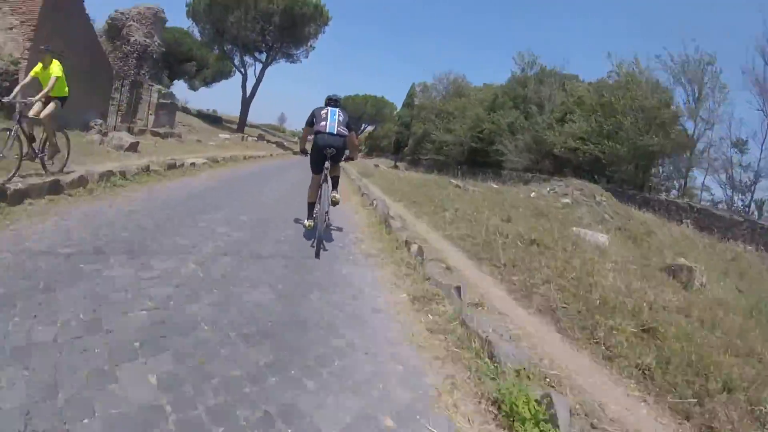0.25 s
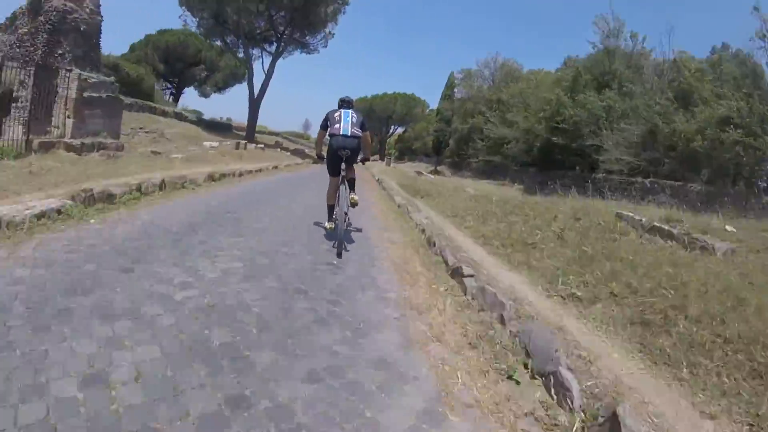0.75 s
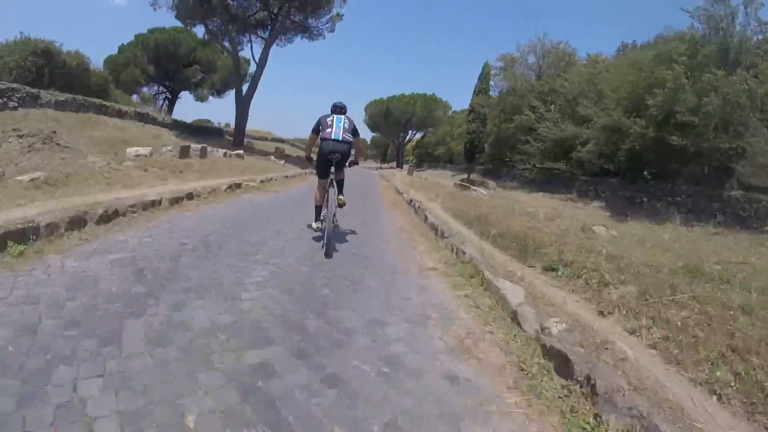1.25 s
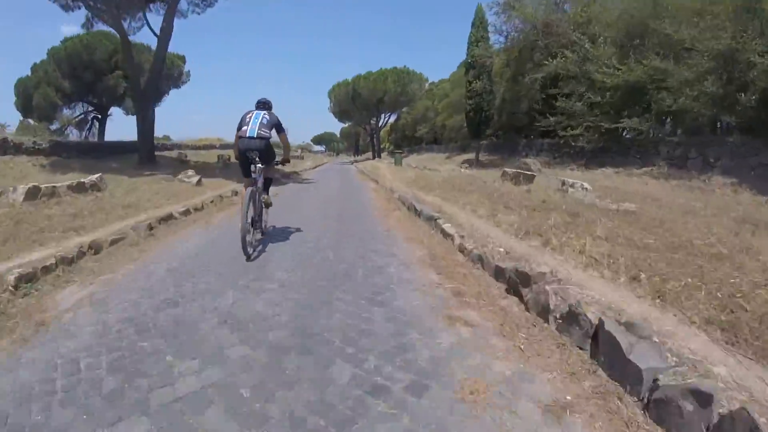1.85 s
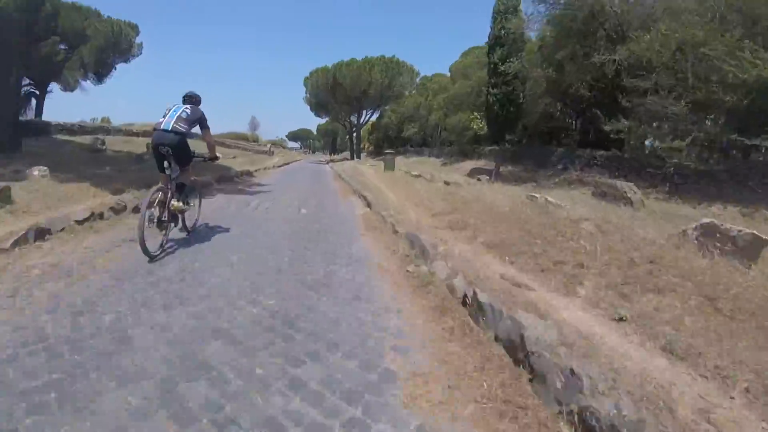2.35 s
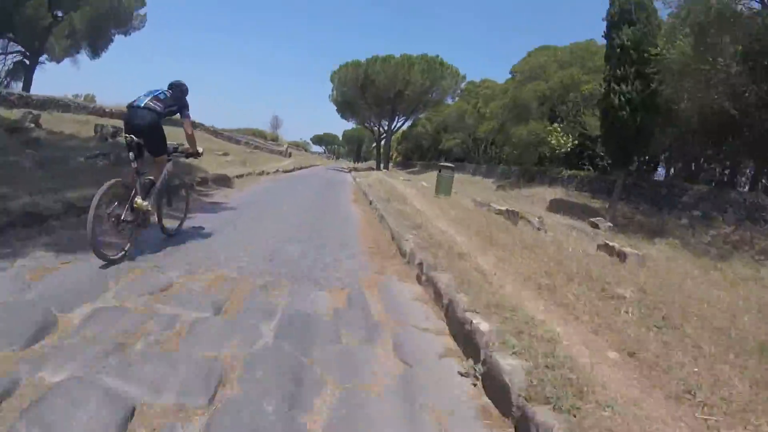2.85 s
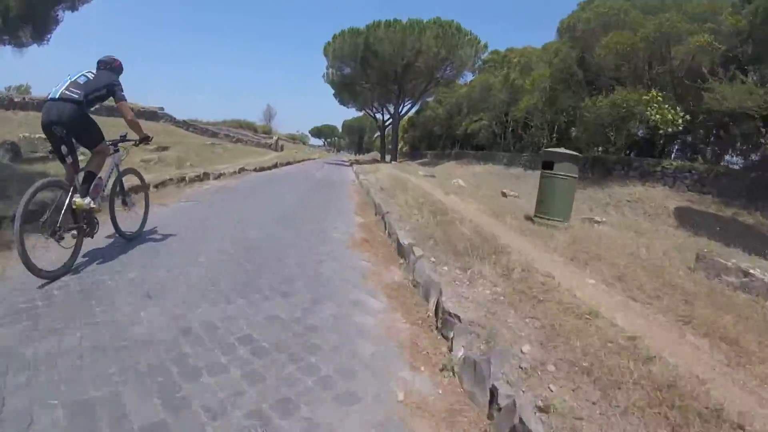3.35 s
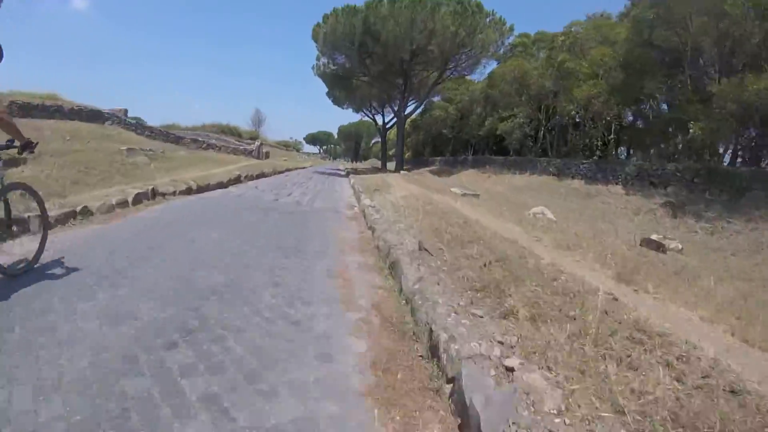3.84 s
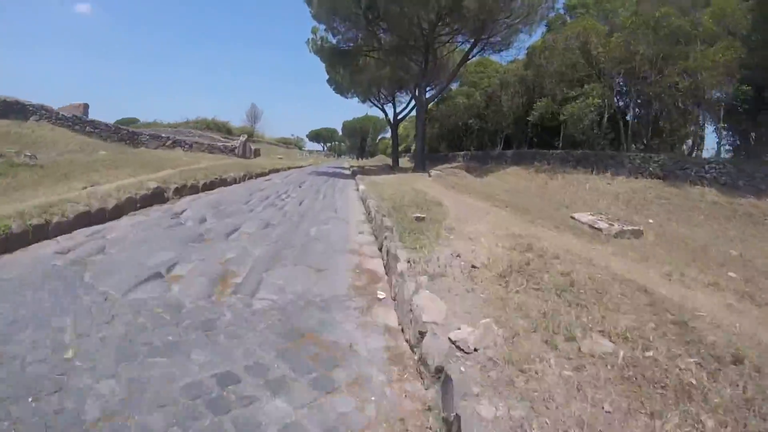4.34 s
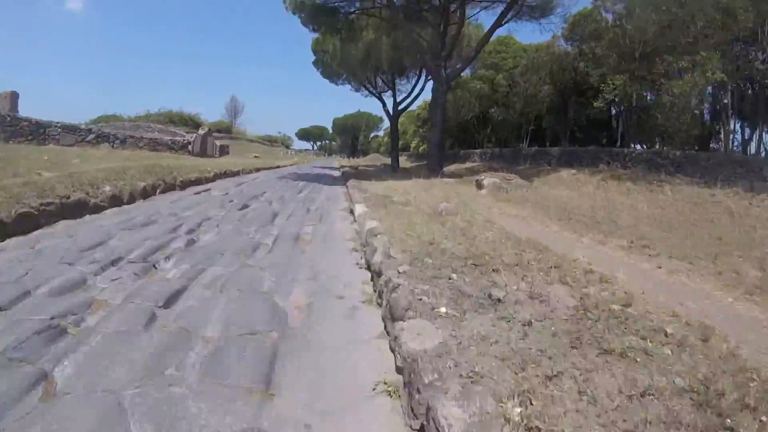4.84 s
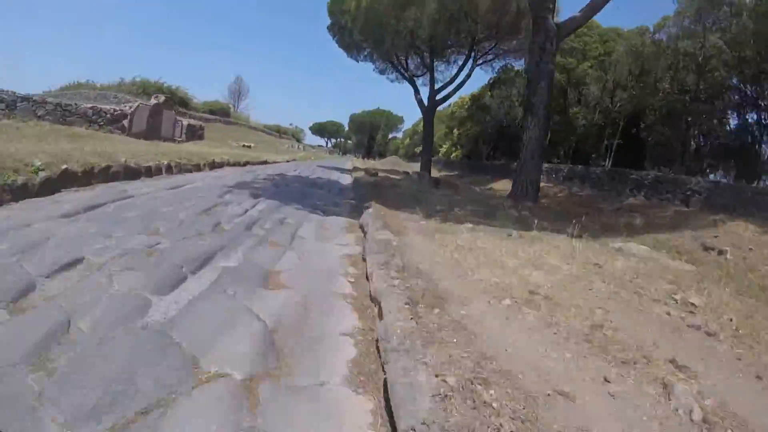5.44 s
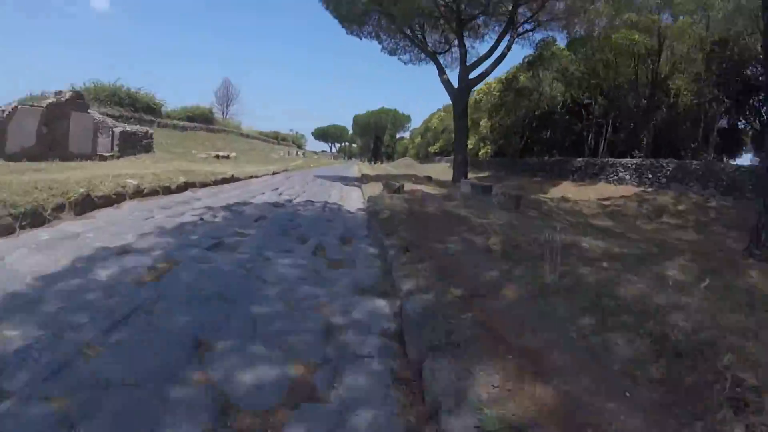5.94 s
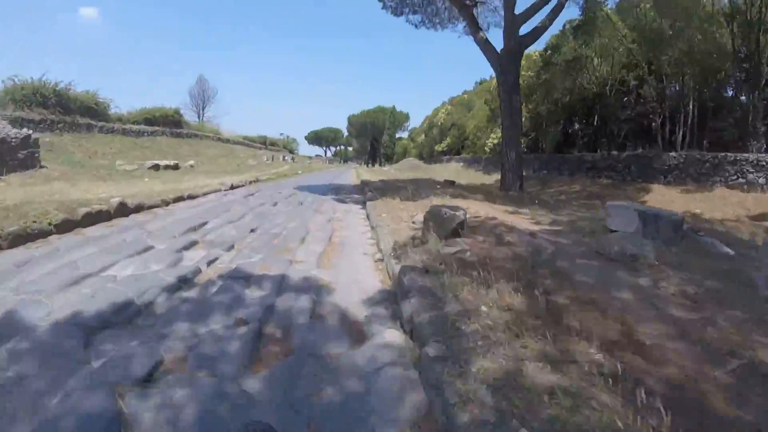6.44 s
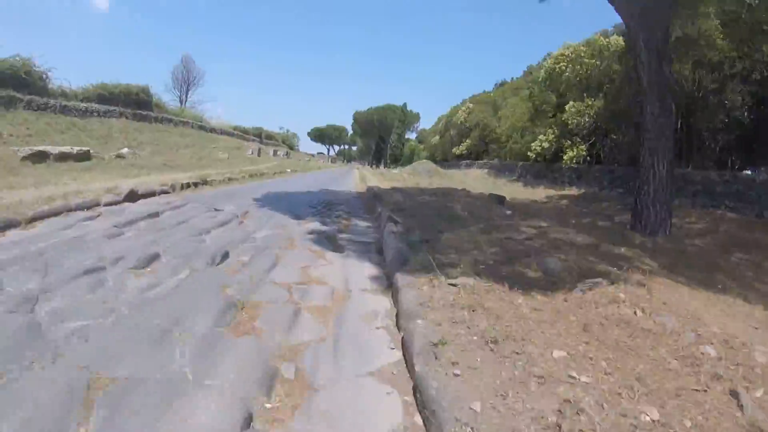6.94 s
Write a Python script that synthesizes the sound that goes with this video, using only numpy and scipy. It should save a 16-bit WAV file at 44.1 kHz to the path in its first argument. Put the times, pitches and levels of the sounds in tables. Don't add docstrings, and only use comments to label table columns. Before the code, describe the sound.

Low, shaky rumble of a bike on rough stone paving, with hollow tube knocks, small clicks and wind buffeting, growing more broken and clattery.

```python
import sys
import numpy as np
from scipy import signal
from scipy.io import wavfile
from scipy.ndimage import uniform_filter1d

SR = 44100
rng = np.random.default_rng(int(sys.argv[2]) if len(sys.argv) > 2 else 0)


def file_out(sig):
    cols = np.atleast_2d(sig).T
    lim = np.clip(cols, -1, 1)
    pcm = np.round(lim * 32767).astype(np.int16)
    wavfile.write(sys.argv[1], SR, pcm)


def convert_level_to_amplitude(level_db):
    exponent = np.asarray(level_db, float) / 20
    return 10 ** exponent


N = 317074

# t/s, unevenness (0-1)
UNEVENNESS = [(0, 0), (2.9, 0.56), (3.1, 0.9), (3.5, 0.5), (4.4, 0.5), (4.9, 1), (7.19, 0.95)]
# t/s, level/dB
FRAME_SHAKING = [(0.0, -20.5), (0.14, -26), (0.41, -24), (0.95, -22), (1.35, -22.5), (1.55, -20.5),
                 (2.1, -20.5), (2.55, -20.5), (3.15, -23), (3.5, -26), (4.0, -24), (4.3, -23), (5.13, -24),
                 (5.33, -23.5), (5.6, -25), (6.1, -26.5), (6.5, -31), (7.19, -27)]
# t/s, peak level/dB, ring f/Hz, decay time t60/s
TUBE_KNOCKS = [(0.003, -10.5, 710, 0.028), (0.038, -17, 646, 0.056), (0.1002, -16, 685, 0.085),
               (0.616, -16.5, 590, 0.027), (2.734, -16.5, 570, 0.038), (4.343, -19.5, 570, 0.051),
               (1.353, -14, 570, 0.074), (1.418, -11.5, 563, 0.028), (1.799, -4, 554, 0.011),
               (3.219, -12, 692, 0.077), (3.274, -13.5, 545, 0.082), (3.311, -13, 623, 0.059),
               (4.204, -13, 600, 0.037), (4.728, -4.5, 457, 0.037), (4.843, -15, 640, 0.034),
               (5.073, -13.5, 398, 0.21), (5.118, -13.5, 595, 0.15), (5.424, -1.5, 367, 0.019),
               (5.658, -10, 425, 0.021), (5.821, -9.5, 435, 0.018), (5.985, -12.5, 423, 0.037),
               (6.093, -14.5, 637, 0.039), (6.339, -18, 560, 0.045), (6.413, -10, 580, 0.033),
               (6.556, -15.5, 553, 0.028), (6.6907, -6, 583, 0.013), (6.783, -11.5, 586, 0.013),
               (7.109, -18, 596, 0.094), (0.153, -17.5, 580, 0.064), (0.467, -17.5, 537, 0.077),
               (0.931, -15, 592, 0.092), (1.052, -18.5, 590, 0.031), (1.217, -19.5, 540, 0.094),
               (1.508, -17.5, 650, 0.062), (1.719, -17, 566, 0.086), (1.878, -13.5, 614, 0.053),
               (2.081, -19.5, 686, 0.11), (2.373, -16.5, 520, 0.053), (2.415, -21, 575, 0.028),
               (2.477, -19, 596, 0.068), (2.842, -12, 553, 0.11), (3.04, -8.5, 586, 0.017),
               (3.363, -15, 570, 0.03), (3.587, -17.5, 567, .04), (3.84, -14.5, 526, 0.062),
               (5.245, -16, 550, 0.051), (5.787, -22, 640, 0.071), (6.253, -21.5, 701, 0.099),
               (6.644, -19.5, 540, 0.033), (5.3, -25, 715, 0.039)]


def evened(x):
    return x / np.sqrt(np.mean(x ** 2) + 1e-20)


def curve(rows):
    s, values = np.transpose(rows)
    return np.interp(np.arange(N) / SR, s, values)


def shaking_above_mean():
    mean_db = -23
    return curve(FRAME_SHAKING) - mean_db


def add(mix, s, sound):
    part = mix[round(s * SR):][:len(sound)]
    part += sound[:len(part)]


def band(x, lo_hz, hi_hz, order=2):
    return signal.sosfilt(signal.butter(order, [lo_hz, hi_hz], "band", fs=SR, output="sos"), x)


def colour(x, points):
    f, db = np.transpose(points)
    hz = abs(np.fft.fftfreq(8192, 1 / SR))
    gain_db = np.interp(np.log(hz + 1), np.log(f + 1), np.maximum(db, -100))
    log_gain = np.log(convert_level_to_amplitude(gain_db))
    response = np.fft.ifft(np.exp(np.conj(signal.hilbert(log_gain)))).real[:4096]
    return signal.oaconvolve(x, response)[:len(x)]


def resonate(x, hz, width):
    turn = np.exp(2j * np.pi * np.cumsum(hz * np.ones(len(x))) / SR)
    r = np.exp(-np.pi * width / SR)
    return 2 * (turn * signal.lfilter([1 - r], [1, -r], x / turn)).real


def lumps(lo_hz, hi_hz, depth_db):
    wander = evened(band(rng.standard_normal(N), lo_hz, hi_hz, order=1))
    return convert_level_to_amplitude(depth_db * np.clip(wander, -3, 3))


def taps(per_s, spread_db):
    draw = rng.random(N)
    size = np.minimum(rng.exponential(1, N), 4)
    return evened((draw < per_s / SR) * convert_level_to_amplitude(spread_db * size) * rng.choice([-1, 1], N))


def cicadas():
    # t/s, level/dB
    song_level = [(0, -85.5), (.9, -77.5), (1.4, -69.5), (1.75, -66), (2.1, -64), (2.45, -59), (2.8, -60),
                  (3.0, -58)]
    # f/Hz, width/Hz, level/dB
    tymbal = [(4750, 600, 0), (5400, 700, -1), (8200, 2200, -17)]
    t = np.arange(N) / SR
    buckles = taps(per_s=4000, spread_db=1.5)
    song = sum(convert_level_to_amplitude(db) * resonate(resonate(buckles, hz, w), hz, w) for hz, w, db in tymbal)
    throb_db = 9.5 * np.cos(2 * np.pi * 5.31 * (t - 1.1)) * np.clip(1.4 - 0.47 * t, .2, 1)
    passed = np.clip((song_level[-1][0] - t) / 0.17, 0, 1)
    return convert_level_to_amplitude(curve(song_level) + throb_db) * evened(song) * passed * lumps(15, 80, 1.7)


def air():
    # t/s, level/dB
    buffeting = [(0.0, -27.5), (0.86, -25), (1.82, -22.5), (3.12, -23.5), (3.56, -31), (3.95, -29),
                 (4.14, -23.5), (4.9, -24.5), (5.63, -23), (6.1, -25.5), (6.4, -32.5), (6.6, -25.5),
                 (7.19, -31.5)]
    gusts = band(rng.standard_normal(N), 18.0, 43.6) * lumps(4.0, 9.7, 0.62)
    return convert_level_to_amplitude(curve(buffeting) - 1.0) * evened(gusts)


def chips():
    # t/s,
    # level/dB, f/Hz
    frame_chips = [(0.209, -57, 3700), (0.679, -50, 2800), (0.762, -54, 2800), (0.886, -50, 3700),
                   (1.107, -55.5, 3700), (1.175, -44, 2250), (1.6908, -40.5, 2400), (2.983, -55, 5200),
                   (3.047, -56.5, 8250), (3.075, -44, 1300), (3.141, -42, 1280), (3.222, -50.5, 3700),
                   (3.317, -61, 8250), (3.444, -60, 8200), (3.486, -60, 8250), (3.6, -68, 8250),
                   (3.923, -46, 5200), (3.956, -58, 8250), (4.14, -45.5, 1800), (4.39, -45, 1300),
                   (4.454, -46, 3700), (4.736, -38, 1300), (4.875, -57.5, 8250), (4.908, -41, 1300),
                   (5.008, -49, 5250), (5.077, -40, 1300), (5.128, -36, 2720), (5.249, -44, 1290),
                   (5.328, -52.5, 5300), (5.515, -53, 5250), (5.525, -59, 8200), (5.535, -38, 1270),
                   (5.649, -50.5, 3700), (5.6601, -41, 8100), (5.672, -51, 5250), (5.681, -62, 8250),
                   (5.69, -54, 5250), (5.728, -51, 5250), (5.737, -54, 8250), (5.788, -46, 2300),
                   (5.823, -49.5, 5250), (5.914, -52, 5250), (5.927, -62, 8200), (5.99, -47, 5250),
                   (6.083, -65, 8250), (6.092, -41, 1290), (6.099, -62, 8250), (6.221, -41.5, 1290),
                   (6.234, -62.5, 8200), (6.338, -54, 1300), (6.368, -62, 5250), (6.386, -60, 8250),
                   (6.596, -59, 5250), (6.619, -55, 3700), (6.646, -41, 1300), (6.799, -58, 8250),
                   (6.998, -53, 2300), (7.114, -58.5, 8200),
                   (1.6908, -41, 3450), (3.046, -46, 3760), (3.047, -52, 5170), (3.439, -66, 8250),
              (3.6, -71, 8250), (4.087, -48, 3700), (4.134, -48, 3700), (4.14, -68, 8250),
              (4.629, -66.5, 8250), (4.729, -47, 3700), (4.73, -46, 2300), (4.73, -60.5, 8250),
              (4.73, -55, 5250), (4.742, -47, 2300), (4.799, -68, 8250), (5.054, -71, 8250),
              (5.078, -58, 5250), (5.127, -49.5, 5250), (5.128, -64, 8250), (5.212, -52, 5250),
              (5.225, -61.5, 8250), (5.375, -68, 8250), (5.426, -51, 5250), (5.534, -59, 8250),
              (5.539, -45, 3700), (5.568, -59, 5250), (5.64, -50, 3700), (5.6605, -33, 3700),
              (5.681, -61.5, 8250), (5.689, -44, 3700), (5.801, -66.5, 8250), (5.824, -44, 3700),
              (5.912, -56, 5250), (5.984, -55.5, 8250), (5.992, -51, 2300), (6.08, -55, 5250),
              (6.097, -60.5, 8250), (6.157, -64, 8250), (6.203, -46.5, 3700), (6.221, -62, 5250),
              (6.234, -57.5, 8100), (6.235, -53, 3700), (6.235, -54, 5250), (6.259, -47.5, 2300),
              (6.284, -61, 8250), (6.368, -65, 8250), (6.473, -59, 3700), (6.505, -56, 2300),
              (6.506, -50, 3700), (6.586, -67, 8250), (6.619, -62, 5250), (6.734, -56, 5250),
              (6.798, -48, 5200), (6.888, -56, 2300), (6.997, -55, 8250), (7.115, -46.5, 5170)]
    chip_ms, relative_width, contact_weight = 1.3, 0.4, 3.5
    out = np.zeros(N)
    events = frame_chips
    u = np.arange(700) / SR * 1000 / chip_ms
    contact = contact_weight * (np.arange(700) == 20)
    for (s, db, hz), noise in zip(events, rng.standard_normal((len(events), 700))):
        blow = noise * u ** .5 * np.exp(-2.2 * u) + contact
        width = relative_width * hz
        ring = resonate(resonate(blow, hz, width), hz, width)
        add(out, s, convert_level_to_amplitude(db) * ring * np.sqrt(90 / np.sum(ring ** 2)))
    return out


def cracks():
    # t/s, peak level/dB, direction (+1 or -1), settling time/ms
    releases = [
        (4.5763, -32.5, -1, 0.046),
        (4.5835, -13.5, -1, 0.11),
        (5.657, -35, 1, .05),
        (5.6606, -12.5, 1, 0.95),
    ]
    t, out = np.arange(700) / SR, np.zeros(N)
    for s, db, way, ms in releases:
        add(out, s, np.sign(way) * convert_level_to_amplitude(db) * band(np.exp(-t * 1000 / ms), 500, 6500, order=1))
    return out


def bracket_raps():
    # t/s, peak level/dB
    raps = [(3.018, -29), (3.041, -29), (3.071, -31), (3.142, -32), (3.337, -40.5), (4.617, -49),
            (4.668, -43), (4.716, -36), (4.7288, -30), (4.875, -44), (4.984, -35), (5.04, -33),
            (5.192, -41), (5.208, -36), (5.606, -31), (5.719, -40), (5.944, -40), (5.985, -30),
            (6.069, -37), (6.091, -34), (6.149, -35), (6.32, -49), (6.452, -46), (6.525, -43),
            (6.739, -42.5)]
    t60_s, rise_s = .02, 0.0011
    t, out = np.arange(700) / SR, np.zeros(N)
    note = sum(np.sin(2 * np.pi * hz * t) for hz in (1070, 1500))
    note = note * convert_level_to_amplitude(-60 * t / t60_s) * np.minimum(t / rise_s, 1)
    for s, db in raps:
        add(out, s, convert_level_to_amplitude(db) * note)
    return out


def clicks():
    # t/s, level/dB, brightness/dB, length/ms
    snaps = [(0.006, -43.5, 8, 4.9), (0.042, -51.5, 0, 2.9), (2.567, -46, -2, 0.99),
             (2.983, -51.5, 14, 1.2), (3.047, -52, -5, 0.88), (4.731, -33.5, -20, 6.2),
             (5.008, -54, 10, 3.1), (5.063, -44, 6, 1.2), (5.126, -46, -18.5, 5), (5.479, -51, 11, 2.4),
             (5.533, -62, 7, 1.2), (5.543, -42.5, 15.5, 2), (5.662, -41, -7, 1.7),
             (5.985, -35.5, -13.5, 5.9), (6.203, -47.5, 7.5, 2.8), (6.506, -50.5, 6.5, 6.7),
             (6.798, -39, -15, 6), (6.997, -43.5, 0, 6.4), (7.11, -39, -12, 5.6)]
    # t/s, level/dB, length/ms
    slaps = [(3.038, -38, 4.8), (3.141, -50.5, 3.8), (3.217, -44, 17), (3.272, -39.5, 3.8),
             (3.311, -39, 13), (3.434, -40, 13), (3.914, -48, 34), (3.066, -54, 11), (3.485, -43, 4.4),
             (4.746, -49, 8.9), (4.805, -41, 8.9), (4.9, -48, 19), (4.94, -47, 8.4), (5.074, -41, 10),
             (5.087, -42, 10), (5.112, -39.5, 33), (5.25, -57, 6.3), (5.425, -43, 5.2), (5.584, -35.5, 2.6),
             (5.673, -40, 3.8), (5.728, -41, 11), (5.787, -44.5, 12), (6.091, -48, 4.7), (6.211, -43, 11),
             (6.253, -42, 8.3), (6.691, -45.5, 4.4), (6.786, -43, 2.5), (6.902, -42.5, 9)]
    # t/s, level/dB, length/ms
    scrapes = [(1.691, -41.5, 4.3), (2.744, -49, 2.3), (4.086, -51, 7), (4.133, -40, 22),
               (4.212, -47.5, 12), (4.372, -47, 27), (4.436, -48, 34), (3.014, -46.5, 6.1),
               (5.642, -59, 3.6), (6.235, -57, 4), (4.479, -44.5, 3.5), (5.142, -46, 3.3),
               (5.524, -50, 4.6), (5.68, -51, 8.7), (5.808, -45, 1.3), (5.819, -46.5, 5.2),
               (6.333, -49, 1.4), (6.646, -57, 3), (6.888, -48.5, 2.2)]
    # t/s, level/dB
    ticks = [(5.326, -57), (5.411, -54), (5.427, -57), (5.513, -56), (5.568, -57.5), (5.674, -53),
             (5.74, -59), (5.912, -54), (6.08, -49), (6.366, -60), (6.383, -61), (6.548, -63), (6.596, -63),
             (6.619, -58), (6.733, -56)]
    # dull, middle, cavity, bright level/dB; the tilt is dB per dB of brightness
    snap, snap_tilt = (-9.5, -4, -11, -16), (0.28, 0.38, 0.36, 1.23)
    slap, scrape, tick = (-5.5, -13, -18, -28.5), (-16.5, -1.3, -24, -20), (-2, -4, 3, -12)
    tick_ms = 4.2

    rows = [(s, ms, db + np.add(snap, bright_db * np.array(snap_tilt))) for s, db, bright_db, ms in snaps]
    rows += [(s, ms, np.add(db, slap)) for s, db, ms in slaps]
    rows += [(s, ms, np.add(db, scrape)) for s, db, ms in scrapes]
    rows += [(s, tick_ms, np.add(db, tick)) for s, db in ticks]
    t, out = np.arange(2600) / SR, np.zeros(N)
    for (s, ms, parts_db), noise in zip(rows, rng.standard_normal((len(rows), 2600))):
        u = t * 1000 / ms
        burst = noise * u ** .7 * np.exp(-1.8 * u ** 1.7)
        burst[8] = 32 / ms ** 2
        dull = band(burst, 850, 2000)
        middle = band(burst, 1600, 3300, order=3)
        cavity = resonate(resonate(burst, 6530, 260), 6970, 700)
        bright = band(burst, 3300, 9500)
        samples = max(ms, 2) * SR / 1000
        parts = zip(parts_db, (dull, middle, cavity, bright))
        add(out, s, sum(convert_level_to_amplitude(db) * p * np.sqrt(samples / np.sum(p ** 2)) for db, p in parts))
    return out


def tyres(stones, clatter):
    # f/Hz, level/dB
    case = [(470, -25), (800, 0.5), (1000, -10), (1190, -12.5), (2010, -18), (2700, -21), (4100, -29),
            (5300, -27), (6000, -34.5), (6550, -35), (8400, -37.5), (10400, -51.5), (11400, -55),
            (12400, -52.5)]
    roar_db, roar_follow = -47.5, 0.74
    rattle_db, rattle_follow, rattle_slab_db = -74, 0.43, 6
    more_db, uneven = shaking_above_mean(), curve(UNEVENNESS)

    ragged = signal.lfilter([1], [1, -.99], abs(taps(per_s=330, spread_db=.3)))
    crackle = evened(band(ragged * rng.standard_normal(N), 300, 6100, order=1))
    hiss = stones ** 0.11 * rng.standard_normal(N) * lumps(8.7, 62, 1.0)
    loose = clatter * (1.51 * taps(per_s=400, spread_db=4.0) + 0.48 * rng.standard_normal(N))
    grit = convert_level_to_amplitude(-2.5 * uneven) * hiss + 0.5 * uneven * crackle + uneven * band(loose, 400, 1400)
    roar = colour(grit, case)
    roar /= np.std(band(roar, 1000, 4000))

    ticking = uneven * taps(per_s=61, spread_db=0.0) + 0.97 * rng.standard_normal(N)
    rattle = resonate(resonate(ticking, 6525, 160), 6525, 400)
    rattle_level = rattle_db + rattle_follow * more_db + rattle_slab_db * uneven
    return convert_level_to_amplitude(roar_db + roar_follow * more_db) * roar + convert_level_to_amplitude(rattle_level) * evened(rattle)


def around_knocks():
    dip_s, dip = .022, 0.42
    decay_s, clatter_db = 0.012, 19.5
    t, lull, clatter = np.arange(N) / SR, np.ones(N), np.zeros(N)
    for s, db, *_ in TUBE_KNOCKS:
        lull *= 1 - dip * ((t < s) & (t > s - dip_s))
        add(clatter, s, convert_level_to_amplitude(min(db, -9) + clatter_db) * np.exp(-t[:4000] / decay_s))
    return uniform_filter1d(lull, size=90), clatter


def surges():
    # t/s, level change/dB, spread/ms
    loads = [(0.026, 0, 14), (0.257, -2, 50), (0.493, 4, 14), (0.979, 1.5, 25), (1.231, 2.5, 14),
             (1.309, -2, 22), (1.527, 3.5, 13), (1.574, -4.5, 14), (2.133, -2.5, 11), (2.6, -3.7, 29),
             (2.975, -2.5, 12), (3.035, 0, 10), (3.142, 2.5, 10), (3.227, 1.5, 9.6), (3.259, -7.5, 9.5),
             (3.311, 5.5, 16), (3.406, -3.5, 12), (3.474, -7, 5.1), (3.652, 1.5, 12), (3.981, -4.5, 22),
             (4.155, 1.5, 50), (4.298, -2.5, 35), (4.685, -1.5, 12), (4.736, 8, 13), (4.804, -2.5, 14),
             (5.122, 6.5, 16), (5.182, -5, 12), (5.336, -7, 28), (5.423, 5, 15), (5.581, 5.5, 7.3),
             (5.669, 2.5, 11), (5.823, 6, 11), (5.871, -6.5, 14), (5.987, 8.5, 10), (6.052, -7.5, 8.4),
             (6.097, 5.5, 9.5), (6.34, 4.5, 10), (6.417, 3.5, 9.2), (6.495, -0.5, 13), (6.561, 0, 11),
             (6.697, 7.5, 14), (6.808, 3, 37), (6.966, -3.5, 13), (7.06, -4, 14), (7.112, 2, 7.9),
             (7.149, -4, 12)]
    ms = np.arange(0, N + 64, 64) * 1000 / SR
    gain_db = sum(db * np.exp(-.5 * ((ms - 1000 * s) / spread) ** 2) for s, db, spread in loads)
    return convert_level_to_amplitude(np.interp(np.arange(N) * 1000 / SR, ms, gain_db))


def mount_hum():
    # middle t/s, length/s, level/dB
    hums = [(0.01, 0.043, -19.5), (0.96, 0.39, -15.5), (1.28, 0.28, -14.5), (1.645, 0.16, -20.5),
            (2.093, 0.1, -11.5), (2.644, 0.32, -21), (3.147, 0.18, -15.5), (3.304, 0.11, -15.5),
            (4.046, 0.17, -21), (4.494, 0.11, -22), (4.737, 0.15, -28.5)]
    hum_db, hum_follow = -30, 0.67
    mount_hz, wander_hz = 88.6, 2.4
    t = np.arange(N) / SR
    hum = resonate(resonate(rng.standard_normal(N), 90.5, 7.6), 89.4, 29)
    hum /= np.sqrt(uniform_filter1d(hum ** 2, 2500) + 0.075 * np.mean(hum ** 2))
    swells = sum(convert_level_to_amplitude(db) * np.cos(np.pi * np.clip((t - s) / length, -.5, .5)) ** 1.2 for s, length, db in hums)
    pitch_hz = mount_hz + wander_hz * evened(band(rng.standard_normal(N), 1.37, 11))
    tone = np.sin(2 * np.pi * np.cumsum(pitch_hz) / SR)
    return convert_level_to_amplitude(hum_db + hum_follow * shaking_above_mean()) * hum + 0.94 * swells * tone


def tube_ring(stones):
    # f/Hz, width/Hz, level/dB
    modes = [(547, 27.7, -1), (595, 50.4, 0.5), (641.6, 85, -3), (681.2, 42, -5)]
    ring_db, follow, slab_db = -30.5, 1.42, -3.5
    pings = stones ** 0.5 * (taps(per_s=220, spread_db=3.0) + 1.75 * rng.standard_normal(N))
    ring = sum((-1) ** k * convert_level_to_amplitude(db) * resonate(pings, hz, w) for k, (hz, w, db) in enumerate(modes))
    ring = band(ring, 300, 1500)
    level_db = ring_db + follow * shaking_above_mean() + slab_db * curve(UNEVENNESS)
    return convert_level_to_amplitude(level_db) * evened(ring)


def frame_rumble(stones):
    # f/Hz, level/dB (per Hz)
    response = [(35, -33), (60, -0.5), (83, 1), (156, -4.5), (221, -5), (254, -10.5), (360, -6), (487, -15),
                (625, -13), (755, -21), (877, -32), (1100, -36), (1200, -43.5), (1560, -50), (2640, -120)]
    blows = stones * (taps(per_s=300, spread_db=2.5) + 2.05 * rng.standard_normal(N))
    shake = colour(blows, response)
    shake /= np.std(band(shake, 110, 450))
    return convert_level_to_amplitude(curve(FRAME_SHAKING) - 0.5) * shake


def tube_knocks():
    partials = ((1.028, 1), (0.62, 0.093), (0.65, 0.51), (2.1, 0.088))
    t, out = np.arange(4000) / SR, np.zeros(N)
    onset = np.minimum(t / 0.0009, 1) * (1 + 0.37 * np.exp(-t / .0015))
    for s, db, hz, t60 in TUBE_KNOCKS:
        ring = sum(a * np.sin(2 * np.pi * m * hz * t) * convert_level_to_amplitude(-60 * m * t / t60) for m, a in partials)
        add(out, s, -convert_level_to_amplitude(min(db, -6) - 4.5) * ring * onset)
    return out


def jolts():
    # t/s, peak level/dB, push length/ms
    strikes = [(0.356, -11.5, 2.5), (0.615, -3, 2.45), (0.687, -4, 1.8), (1.248, -21, 9.9),
               (1.522, -9, 1.7), (1.85, -8.5, 2.2), (1.96, -6.5, 4.1), (2.259, -8, 3.1), (3.021, -5, 2),
               (4.044, -5.5, 2.6), (4.647, -5.5, 2.7), (4.728, -9, 3.6), (4.977, -7, 2), (4.846, -9, 1.4),
               (5.034, -9.5, 1.7), (5.079, -10.5, 1.2), (5.121, -10, 0.69), (5.071, -9.5, 2.3),
               (5.116, -8, 3.1), (5.214, -8.5, 1.4), (5.396, -12, 2.8), (5.412, -5, 2), (5.577, -8.5, 1.6),
               (5.687, -9, 1.8), (5.732, -8, 2), (5.823, -7.5, 1.8), (5.987, -5.5, 1.7), (6.094, -4.5, 2.2),
               (6.335, -11.5, 1.5), (6.453, -12.5, 2.7), (6.603, -12, 2.3), (6.558, -14, 2.2),
               (6.777, -11.5, 2.1), (6.832, -11.5, 1.5), (7.033, -14, 6.3), (7.103, -11, 2.2),
               (7.1835, -14, 3), (7.1895, -16.5, 3.6)]
    out = np.zeros(N)
    for s, db, ms in strikes:
        u = np.arange(-3, 7, 1000 / SR / ms)
        climb = np.exp(-np.where(u < 0, 1.6, 5.0) * u ** 2)
        rebound = 0.4 * np.exp(-1.4 * (u - 1.3) ** 2) + 0.19 * np.exp(-.6 * (u + 0.5) ** 2)
        add(out, s - .003 * ms, convert_level_to_amplitude(db + 1.5) * (climb - rebound))
    return out


def scene():
    lull, clatter = around_knocks()
    stones = lumps(10, 60, 2.04) ** (1 + 0.3 * curve(UNEVENNESS)) * lull
    load = surges()
    background = cicadas() + air()
    loose_parts = chips() + cracks() + bracket_raps() + clicks()
    hiss = load ** 0.6 * tyres(stones, clatter)
    frame = mount_hum() + tube_ring(stones * load) + frame_rumble(stones * load)
    return (background + loose_parts + hiss + frame + tube_knocks() + jolts())[None]


def roll_off(x):
    return signal.sosfilt(signal.butter(12, 12600, fs=SR, output="sos"), x)


def record(dry):
    dulled = signal.sosfilt(signal.butter(2, 10500, fs=SR, output="sos"), dry)
    limited = .65 * np.tanh(dulled / .65)
    return roll_off(limited)


dry = scene()
out = record(dry)
file_out(out)
```